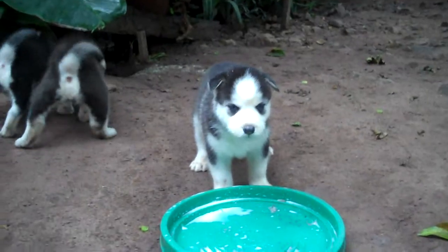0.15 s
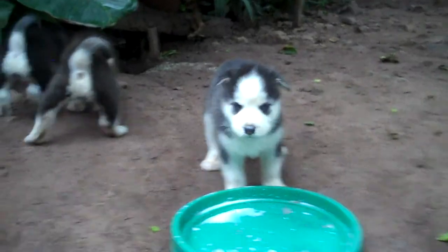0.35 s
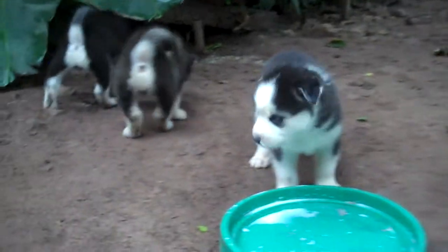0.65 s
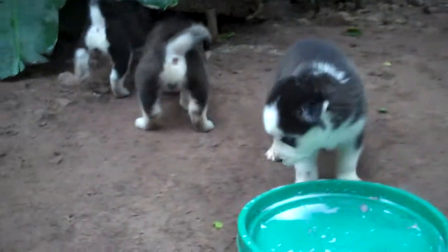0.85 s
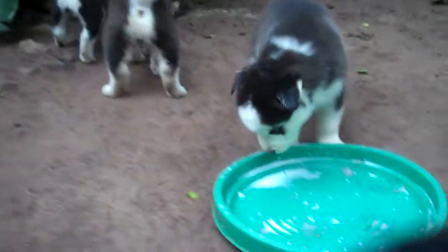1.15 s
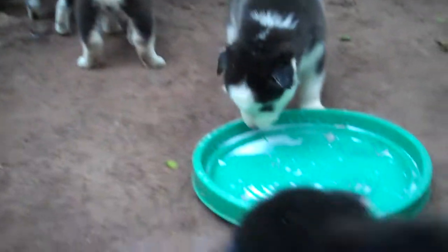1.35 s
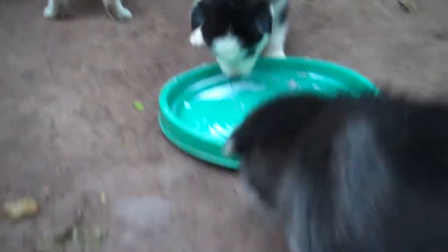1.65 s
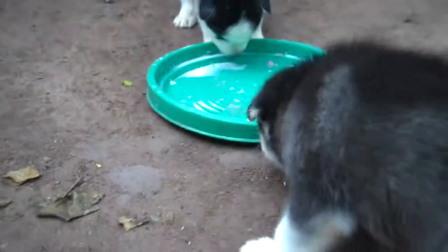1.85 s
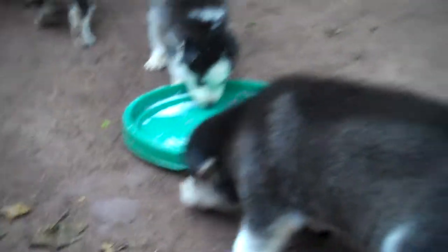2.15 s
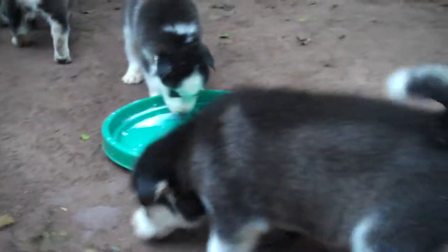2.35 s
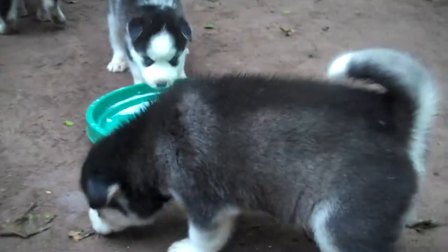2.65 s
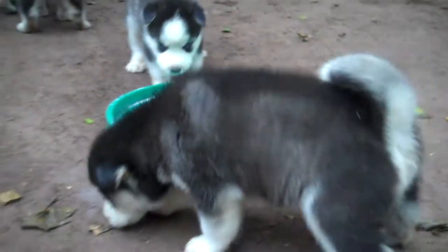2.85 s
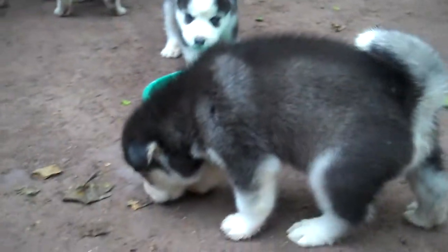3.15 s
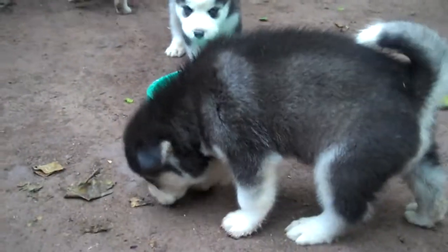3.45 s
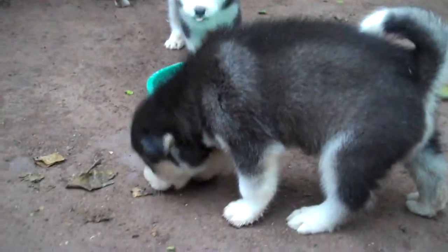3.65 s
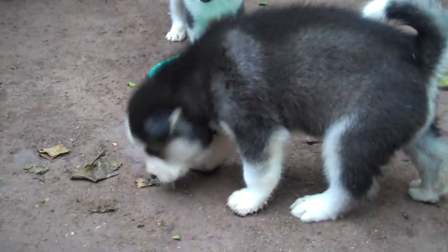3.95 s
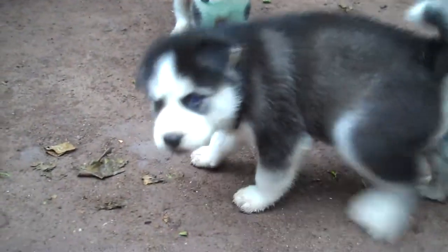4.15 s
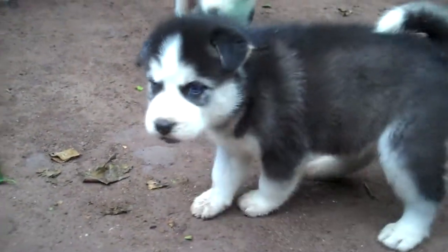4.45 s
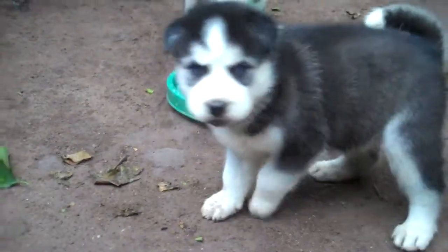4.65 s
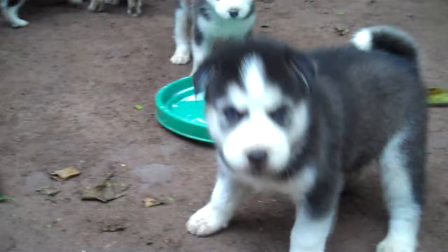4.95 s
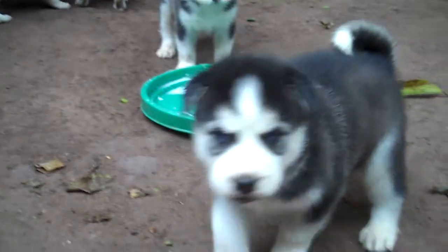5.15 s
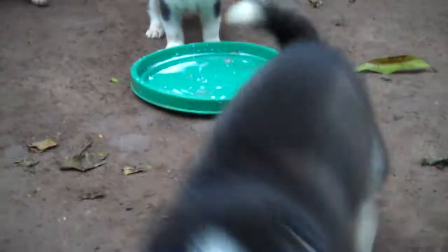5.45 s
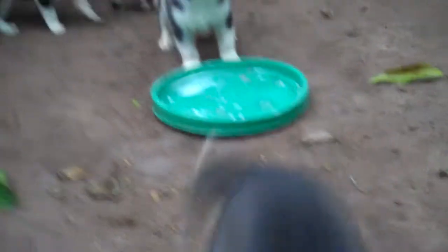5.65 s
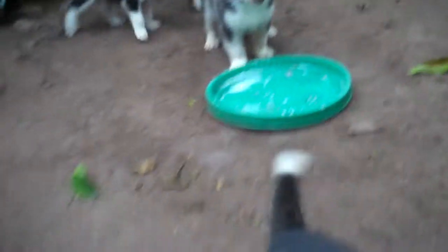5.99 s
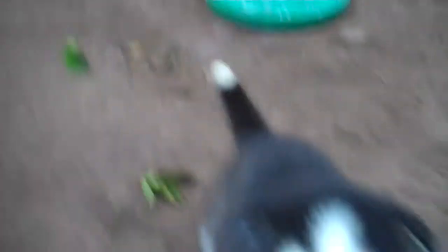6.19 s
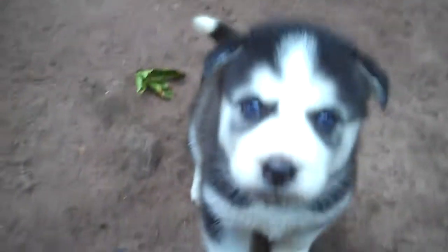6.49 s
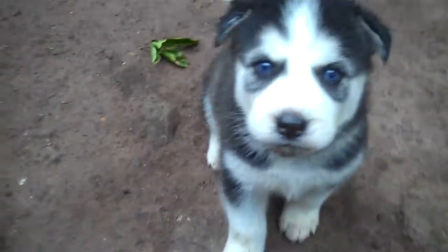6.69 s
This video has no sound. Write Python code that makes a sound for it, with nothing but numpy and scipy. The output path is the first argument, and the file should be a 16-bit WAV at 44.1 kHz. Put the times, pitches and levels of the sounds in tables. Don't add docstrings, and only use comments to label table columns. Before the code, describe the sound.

Gritty paw drags, snapping twigs and crisp leaves over faint outdoor hiss, then a single sharp, distorted high puppy cry, and more scuffling.

```python
import sys
import numpy as np
from scipy import signal
from scipy.fft import rfft, irfft
from scipy.io import wavfile
from scipy.ndimage import uniform_filter1d

SR = 44100
rng = np.random.default_rng(int(sys.argv[2]) if len(sys.argv) > 2 else 0)


def nominal_scale(level):
    x = np.asarray(level, float) / 20
    return 10 ** x


def master(y):
    cut = np.clip(np.atleast_2d(y).T, -1, 1)
    pcm = np.round(cut * 32767)
    wavfile.write(sys.argv[1], SR, pcm.astype(np.int16))


N = 300872
TIME = np.arange(N) / SR

# t/s, pitch f/Hz, level/dB
CRY_ARCH = [
    (5.513, 945, -11),
    (5.521, 710, -13),
    (5.541, 808, -12),
    (5.553, 880, -15.5),
    (5.568, 908, -16),
    (5.584, 885, -16.5),
    (5.6, 822, -15.5),
    (5.622, 690, -12),
    (5.635, 645, -14.5),
]
CRY_END_S = CRY_ARCH[-1][0]
CRACK_END_S, WIDE_UNTIL_S, CLOSE_FROM_S = 5.519, 5.543, 5.602
JAW_S, CUT_S, MURMUR_S = .022, .011, .04


def band(x, hz, width, order=1):
    edges = [max(hz - width / 2, 15), min(hz + width / 2, .47 * SR)]
    return signal.sosfilt(signal.butter(order, edges, "bandpass", fs=SR, output="sos"), x)


def unit(x):
    return x / np.sqrt(np.mean(x ** 2))


def walk(rate, size=N):
    k = int(SR / rate)
    held = np.repeat(rng.standard_normal(size // k + 3), k)
    return unit(uniform_filter1d(held, k))[:size]


def ramp(start, length):
    return np.clip((TIME - start) / length, 0, 1)


def shape(points, hz):
    point_hz, value = np.array(points).T
    return np.interp(np.log(hz), np.log(point_hz), value)


def causal(points):
    size = 2048
    hz = np.maximum(np.arange(size // 2 + 1) * SR / size, 1)
    cepstrum = irfft(np.log(nominal_scale(shape(points, hz))))
    cepstrum[1:size // 2] *= 2
    cepstrum[size // 2 + 1:] = 0
    return irfft(np.exp(rfft(cepstrum)))[:size // 2]


def add(out, start, sound, pan_db):
    i = int(start * SR)
    sound = sound[:N - i]
    out[:, i:i + len(sound)] += sound * nominal_scale(np.array([[pan_db], [-pan_db]]) / 2)


def gain():
    # t/s, gain level/dB
    ducking = [
        (5.54, 0.5),
        (5.552, -1.5),
        (5.64, -3),
        (5.79, -11.5),
        (5.8, -11.5),
        (5.862, -9.5),
        (5.872, -2),
        (6.0, 0),
    ]
    return nominal_scale(np.interp(TIME, *np.transpose(ducking)))


def cry():
    attack_s, sag_hz_per_s = .0095, 9000
    wide_tilt_db, held_tilt_db, shut_tilt_db = .5, -2, -13
    s, hz, db = np.transpose(CRY_ARCH)
    start = s[0] - attack_s
    unopened = 1 - ramp(start, attack_s)
    closing = ramp(CLOSE_FROM_S, JAW_S)
    shut = ramp(CRY_END_S, CUT_S)

    hz = np.interp(TIME, s, hz) - sag_hz_per_s * np.clip(TIME - CRY_END_S, 0, CUT_S + MURMUR_S)
    db = np.interp(TIME, s, db) - 42 * unopened ** 2
    db = db - 19 * shut - 30 * ramp(CRY_END_S + CUT_S, MURMUR_S) ** 2
    crack = np.exp(-abs(TIME - CRACK_END_S) / .004)
    rough = .014 + .2 * crack + .12 * shut + .02 * closing
    tilt_db = wide_tilt_db + (held_tilt_db - wide_tilt_db) * ramp(WIDE_UNTIL_S, JAW_S / 2)
    tilt_db += (shut_tilt_db - held_tilt_db) * closing
    tilt_db += -13 * unopened - 12 * ramp(CLOSE_FROM_S + JAW_S, JAW_S / 2)
    sounding = (TIME > start) & (TIME < CRY_END_S + CUT_S + MURMUR_S)
    return hz, db, rough, tilt_db, sounding


def fold_pulses(hz, phase, tilt_db):
    pulses = 0
    for k in range(1, 17):
        octaves = np.log2(np.maximum(k * hz / 1380, 1))
        level = nominal_scale(np.maximum(tilt_db * octaves, -22))
        rolloff = 1 + (k * hz / 8500) ** (6 - tilt_db)
        pulses = pulses + np.cos(k * phase) * level / rolloff
    return pulses


def sigh():
    level_db, t60_s = -40, .2
    after = np.maximum(TIME - CRY_END_S, 0)
    air = unit(band(rng.standard_normal(N), 4000, 7000, order=6))
    return ramp(CRY_END_S, CUT_S) * nominal_scale(level_db - 60 * after / t60_s) * air


def yelp():
    # f/Hz, level/dB
    throat_colour = [(900, -28), (1400, 0), (2150, -22), (2480, 6), (2720, 10), (3580, -24), (3950, 4),
                     (4350, 6), (4900, -9), (5350, 8), (6100, -12), (6550, 5), (7150, 4), (8000, -16)]
    *controls, sounding = cry()
    hz, db, rough, tilt_db = (c[sounding] for c in controls)
    t, size = TIME[sounding], sounding.sum()
    shut = ramp(CRY_END_S, CUT_S)[sounding]
    hz = uniform_filter1d(hz, size=300) * (1 + 0.27 * rough * walk(700, size=size))
    phase = 2 * np.pi * np.cumsum(hz) / SR
    pulses = fold_pulses(hz, phase, tilt_db)

    breath_level = (.35 + 2.2 * rough) * nominal_scale(np.maximum(1.3 * tilt_db, -17)) + nominal_scale(-9) * shut
    breath = band(rng.standard_normal(size), 4800, 8600, order=3) * (1 + np.cos(phase)) * breath_level
    folds = (pulses * nominal_scale(7.1 * rough * walk(800, size=size)) + breath) * nominal_scale(db)

    direct = 3.2 * rough * band(folds, 1400, 1300, order=2) * (t < 5.53)
    gape = nominal_scale(-5) * (1 - ramp(CRACK_END_S, JAW_S / 2)[sounding]) + nominal_scale(-25)
    direct += gape * band(folds, 980, 500)
    direct += nominal_scale(-12) * shut * band(pulses * nominal_scale(db), 420, 400)
    direct += nominal_scale(-3 + db) * shut * band(breath, 4500, 6000, order=4)

    out, first = np.zeros(N), np.argmax(sounding)
    mouth = signal.fftconvolve(folds, causal(throat_colour))
    out[first:first + len(mouth)] = mouth
    out[sounding] += direct
    out += sigh()
    return -out / gain()


def left_capsule(pup):
    # f/Hz, level/dB
    port_colour = [(3000, 0), (5300, -4), (6400, -3), (7200, 5), (8100, 13), (9000, 12), (12000, 7)]
    left = signal.fftconvolve(pup, causal(port_colour))[:N]
    open_jaws = ramp(WIDE_UNTIL_S, CUT_S) * (1 - ramp(CLOSE_FROM_S, JAW_S))
    return left + nominal_scale(-50) * open_jaws * unit(band(rng.standard_normal(N), 140, 180))


def yard_tail(x):
    # delay t/s, level/dB, spread/s
    walls = [
        (.02, -28, 0.0024),
        (0.046, -47, 0.024),
        (0.092, -56, .08),
        (.28, -69, 0.1),
    ]
    t = TIME[:SR // 2]
    tail = rng.standard_normal((2, len(t))) * nominal_scale(-54 - 60 * t / 0.5) * (t > .004)
    for delay, db, spread in walls:
        tail += rng.standard_normal((2, len(t))) * nominal_scale(db - 60 * abs(t - delay) / spread)
    tail = band(tail, 1250, 800) + 0.17 * band(tail, 4900, 6000, order=3)
    return signal.fftconvolve(x[None], tail, axes=1)[:, :N]


def snaps():
    # t/s, peak level/dB, f/Hz, left minus right/dB
    ticks = [(.557, -40, 7660, 8), (.758, -39, 7080, 5), (.7916, -34, 6340, 6.5), (.842, -29, 7300, 8),
             (.8899, -33, 7400, 8), (.98, -40, 6830, 1), (1.096, -41, 5560, -1), (1.1142, -23, 7400, 12),
             (1.3806, -35, 6410, -.5), (1.466, -40, 5860, 0), (1.5014, -35, 5850, -2),
             (3.3017, -26, 7700, 25), (3.3473, -23, 5100, -3), (3.5278, -39, 5430, -2),
             (3.7838, -33, 5560, 1), (5.2792, -33, 5970, -3), (5.302, -31, 5700, .5),
             (5.4395, -30, 6900, .5), (5.4445, -32.5, 7200, 3.5), (5.463, -25, 7400, 12.5),
             (5.7688, -51, 7530, -1), (5.7798, -46, 6790, 4), (6.022, -47, 6270, -1),
             (6.2452, -35, 3300, -3), (6.2714, -38, 3700, -4), (6.3436, -41, 7540, 3),
             (6.544, -32, 5640, 7), (6.6962, -27, 7400, 17), (6.7177, -29, 7630, 7),
             (6.7326, -26, 7800, 4.5), (6.684, -29, 8000, 12), (6.6868, -24, 7600, 12),
             (6.6942, -29, 7800, 12), (6.7, -29, 7600, 12), (6.704, -29, 7400, 12), (1.1183, -27, 7300, 10),
             (1.1235, -34, 6800, 8), (1.1293, -34, 7200, 8), (1.159, -38, 7600, 8), (1.171, -33, 6500, 4),
             (1.1744, -29, 5600, 0), (1.1797, -34, 6500, 6), (1.1862, -30, 7200, 8),
             (3.3596, -26, 5700, -2), (5.4715, -30, 6800, 6), (1.674, -31, 5000, 0), (3.6985, -36, 6200, 0),
             (3.8868, -30, 5500, -3), (3.9592, -41, 7300, 6)]
    # t/s, peak level/dB, f/Hz, left minus right/dB, ring/s
    stalks = [(.9915, -25, 3100, 1, .015), (1.3488, -33, 1910, .5, .012), (1.612, -37, 2500, 3, .01),
              (1.6739, -28.5, 3020, .5, .017), (1.9586, -39, 1740, -.5, .014), (2.0882, -40, 1750, 5, .029),
              (2.4099, -25.5, 4440, 2, .014), (3.3366, -25, 2880, -1, .0088), (3.344, -37, 3000, 0, .008),
              (3.3594, -20.5, 2000, 2.5, .03), (3.6621, -30, 1870, 4, .03), (5.461, -33, 1600, 0, .015),
              (3.9963, -38, 3900, -3, .03), (4.012, -39, 3850, 2, .04), (3.6437, -35, 3500, 2.5, .011),
              (3.6822, -24, 3600, -1, .0075), (3.698, -35, 2150, 3, .012), (3.8909, -29, 1800, 0, .021),
              (4.123, -38, 3270, 3, .012), (5.4715, -26.5, 2650, 0, .014), (6.555, -20, 2100, 10, .012),
              (6.713, -22.5, 4700, 16, .0059)]
    # t/s, peak level/dB, f/Hz, left minus right/dB, ring/s
    leaves = [(1.0131, -37, 2390, 3, .028), (1.1097, -37, 7280, 8, .03), (1.112, -39, 2400, -1, .06),
              (1.1737, -45, 2080, 0, .039), (1.182, -35, 6900, 8, .008), (1.19, -38, 7300, 8, .008),
              (1.206, -36, 7400, 8, .01), (1.2175, -42, 1600, 1, .041), (2.5892, -32, 5170, -2, .009),
              (3.2947, -31.5, 7300, -4, .011), (3.305, -38, 2400, 1, .06), (3.846, -23.5, 5500, -3, .015),
              (3.8534, -33, 1700, .5, .086), (3.8834, -35, 1870, 7, .04), (3.8866, -34.5, 1860, -3, .061),
              (3.9594, -50, 1820, 3, .056), (3.9963, -40, 3900, -3, .032), (4.0094, -42.5, 3820, 2, .062),
              (5.4804, -26, 2810, 0, .014), (5.487, -33, 2900, 0, .012), (6.1355, -42, 1150, 8, .052),
              (6.687, -33, 3600, 7, .012)]
    rows = [(*row, .012, -13) for row in ticks]
    rows += [(*row, -21) for row in stalks]
    rows += [(*row, 3.5) for row in leaves]
    out, t = np.zeros((2, N)), TIME[:SR // 10]
    for s, db, hz, pan_db, ring, treble_db in rows:
        ring = np.clip(ring, .003, .1)
        push = 10.5 * ring * rng.standard_normal(len(t)) * nominal_scale(-60 * t / ring)
        push[0] = 1
        own = band(push, hz, .25 * hz) + .16 * band(push, 3500, 5000, order=2)
        bright = 1.4 * band(push, 5500, 1000, order=2) + band(push, 7700, 1500, order=2)
        bright += .08 * band(push, 11000, 6000)
        sound = own / abs(own).max() + nominal_scale(treble_db - 1.0) * bright / abs(bright).max()
        add(out, s + .0008, nominal_scale(db - 4.5) * sound, pan_db)
    return out


def thuds():
    # t/s, peak level/dB, f/Hz
    landings = [(1.094, -47.5, 774), (1.558, -45, 694), (1.578, -48, 800), (1.657, -44, 600),
                (1.665, -41, 303), (1.912, -48.5, 670), (2.074, -51.5, 603), (3.249, -49, 466),
                (4.197, -46.5, 507), (4.631, -48, 760), (4.88, -43, 604), (6.134, -42, 1100),
                (6.19, -46, 900), (6.028, -52, 600), (6.343, -51, 600)]
    out, t = np.zeros((2, N)), TIME[:SR // 10]
    for s, db, hz in landings:
        thud = band(rng.standard_normal(len(t)) * nominal_scale(-60 * t / 0.18), hz, .5 * hz)
        add(out, s, nominal_scale(db - 0.5) * thud / abs(thud).max(), 1.5)
    return out


def drag_levels():
    # t/s, treble level/dB, body level/dB
    milling = [
        (0, -72, -63),
        (2.3, -70, -62),
        (3.0, -78, -72),
        (4.3, -72, -66),
        (5.2, -76, -70),
        (6.3, -59, -63),
        (6.82, -66, -64),
    ]
    # loudest t/s, level/dB, rise/s, fall/s over 20 dB, body re treble/dB
    drags = [(.048, -40, .17, .1, -9), (.44, -59, .09, .11, 0), (.556, -64, .01, .3, -1),
             (.78, -56, .12, .25, 3), (1.0, -52.5, .077, .18, -1.5), (1.14, -57, .18, .3, 2),
             (1.38, -55, .07, .04, -1), (1.62, -61.5, .25, .6, 3), (1.96, -61, .04, .085, 2),
             (2.59, -54.5, .011, .042, -2), (2.84, -66, .22, .8, 5), (3.42, -62, .25, .2, 3),
             (3.658, -51.5, .18, .126, -1.5), (3.97, -60, .25, .11, 3), (4.624, -56.5, .26, .2, 2.5),
             (5.31, -49.5, .048, .023, -1.5), (5.44, -50, .09, .15, -6), (5.775, -47, .04, .03, -8),
             (5.946, -54.5, .4, .17, -7.5), (6.07, -62, .2, .2, 8), (6.18, -52, .14, .17, 6),
             (6.345, -64, .06, .06, 8), (6.562, -58, .05, .02, 6), (6.7, -52, .03, .2, -5.5)]
    # loudest t/s, level/dB, rise/s, fall/s over 20 dB
    strokes = [
        (1.195, -50, .05, .062),
        (1.5, -54.5, .05, .06),
        (3.09, -64, .022, .4),
        (3.786, -58, .013, .09),
        (4.966, -58.5, .32, .38),
    ]
    s, treble_db, low_db = np.transpose(milling)
    high = nominal_scale(np.interp(TIME, s, treble_db))
    low = nominal_scale(np.interp(TIME, s, low_db))
    for s, db, rise, fall, body_db in list(drags) + [(*row, -17) for row in strokes]:
        swell = nominal_scale(db - 20 * np.maximum((s - TIME) / rise, (TIME - s) / fall))
        high = np.maximum(high, swell)
        low = np.maximum(low, swell * nominal_scale(body_db))
    return high, low


def scuffs():
    pan_db = 11
    high, low = drag_levels()
    bursts_db = 2.5 * np.minimum(rng.exponential(size=(3, N)), 5) + 2.0 * walk(150)
    grains = rng.standard_normal((3, N)) * nominal_scale(bursts_db)
    treble = band(grains[0], 7180, 2280, order=2) + 0.37 * band(grains[0], 4300, 1550)
    treble = unit(treble + 0.13 * band(grains[0], 10000, 5800))
    other = unit(band(grains[1], 7300, 2600, order=2))
    body = unit(band(grains[2], 2200, 3200, order=2)) * nominal_scale(-1.5)
    quiet = (TIME < 5.505) | (TIME > 5.7)
    sides = nominal_scale(np.array([[pan_db], [-pan_db]]) / 2)
    ports = (treble + .5 * other * np.array([[1], [-1]])) * sides
    return nominal_scale(-1.5) * quiet * (high * ports + low * body)


def calls(table, count, wobble, patchy_db=2.5, throat=None):
    out = np.zeros((2, N))
    for s, length, first_hz, last_hz, db in table:
        u = np.arange(int(length * SR)) / (length * SR)
        hz = (first_hz + (last_hz - first_hz) * u) * (1 + wobble * walk(41, size=len(u)))
        phase = 2 * np.pi * np.cumsum(hz) / SR
        note = 0
        for k in range(1, count + 1):
            note = note + np.sin(k * phase) * (nominal_scale(shape(throat, k * hz)) if throat else 1)
        level = nominal_scale(db + patchy_db * walk(20, size=len(u)))
        add(out, s, level * unit(note) * np.sin(np.pi * u) ** .6, 0)
    return out


def cockerel():
    syllables = [
        (1.2, .09, 378, 372, -63.5),
        (1.29, .08, 370, 385, -63),
        (1.53, .12, 385, 392, -61),
        (1.68, .07, 398, 392, -66),
        (1.8, .1, 365, 392, -61),
        (1.9, .12, 385, 395, -64),
        (2.16, .4, 740, 725, -62.5),
    ]
    # f/Hz, level/dB
    crop_colour = [(300, -20), (750, 2), (1150, -6), (1500, 3), (1950, 0), (2250, -16), (2950, -13),
                   (4000, -25)]
    crow = calls(syllables, count=9, wobble=.018, patchy_db=3.5, throat=crop_colour)
    return 1.3 * crow + 10 * yard_tail(crow[0])


def small_birds():
    # start t/s, length/s, first f/Hz, last f/Hz, level/dB
    coo_notes = [(.55, .35, 350, 340, -71), (1.13, .35, 262, 258, -70), (2.8, .65, 168, 165, -68),
                 (3.17, .16, 470, 480, -61), (2.74, .14, 3200, 3600, -68), (.605, .06, 1850, 2020, -62),
                 (.66, .14, 2840, 2850, -67), (2.11, .07, 2830, 2930, -62), (1.8, .07, 2950, 3080, -69),
                 (1.95, .04, 3080, 3040, -69), (2.68, .14, 1200, 1130, -67), (2.56, .15, 735, 720, -66)]
    # start t/s, length/s, first f/Hz, last f/Hz, level/dB
    lisp_notes = [
        (3.082, 0.02, 7500, 8100, -62),
        (3.105, .025, 7400, 7700, -65),
        (3.13, .025, 8000, 7300, -67),
        (3.163, .012, 7700, 7500, -63.5),
        (3.397, 0.032, 8000, 8500, -66),
        (3.428, 0.021, 7570, 7440, -58),
        (3.445, .024, 9300, 8800, -63),
        (3.464, 0.026, 7900, 8350, -54),
    ]
    coos = calls(coo_notes, count=1, wobble=.012, patchy_db=2.5)
    return coos + calls(lisp_notes, count=1, wobble=.004)


def motor():
    # t/s, level/dB
    drone = [
        (0, -68.5),
        (3, -71.5),
        (4.4, -73),
        (4.7, -68.5),
        (5.5, -62.5),
        (6.82, -63.5),
    ]
    line = unit(band(rng.standard_normal(N), 75, 5.4))
    return line * nominal_scale(np.interp(TIME, *np.transpose(drone)))


def yard():
    # f/Hz, level/dB per Hz
    air_colour = [(15, -40), (25, -18), (103, -7), (162, -6.5), (450, -12), (700, -9), (1500, -14.5),
                  (4600, -16.5), (5250, -10), (5650, -1.5), (6100, -11), (7500, -19.5), (9000, -22.5),
                  (14000, -22), (14800, -53.5)]
    # f/Hz, left-right correlation
    likeness = [(60, 0.6), (300, 0.65), (1400, .45), (3000, -0.45), (5600, -0.35), (9000, -0.41)]
    hz = np.maximum(np.arange(N // 2 + 1) * SR / N, 1)
    like = np.clip(shape(likeness, hz), -.95, .95)
    noise = rfft(rng.standard_normal((2, N))) * nominal_scale(shape(air_colour, hz))
    mid, side = noise * np.sqrt([1 + like, 1 - like])
    out = 0
    for k in range(9):
        octave = np.clip(1 - abs(np.log2(hz / 45) - k), 0, 1)
        out = out + irfft(np.array([mid + side, mid - side]) * octave, N) * nominal_scale(1.0 * walk(6))
    return nominal_scale(-54) * unit(out)


def scene():
    pup = yelp()
    voice = np.array([left_capsule(pup), pup]) + yard_tail(pup)
    paws = scuffs() + snaps() + thuds()
    far = cockerel() + small_birds() + motor() + yard()
    return voice + paws + far


def low_pass(x):
    return signal.sosfilt(signal.butter(12, 14980, fs=SR, output="sos"), x)


def record(dry):
    wet = dry * gain()
    over = (wet - np.clip(wet, -.4, .62)) * (TIME < 5.5455)
    splatter = over * (1 + rng.standard_normal(N)) * np.array([[.9], [.08]])
    lowpass = signal.ellip(6, .5, 50, 14100, fs=SR, output="sos")
    wet = signal.sosfilt(lowpass, wet - splatter)
    mix = np.clip(wet, -.995, .995)
    return low_pass(mix)


dry = scene()
out = record(dry)
master(out)
```